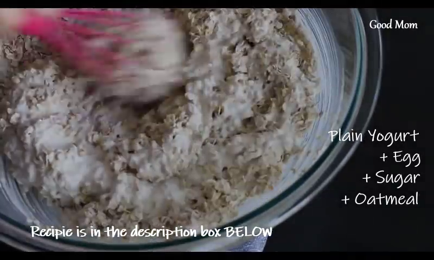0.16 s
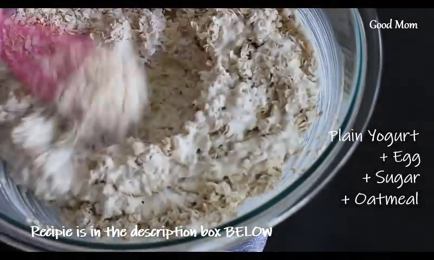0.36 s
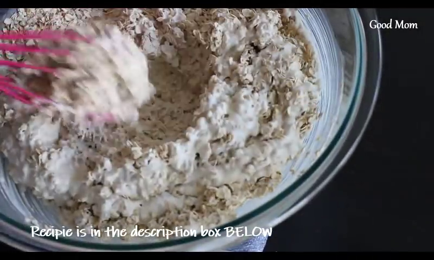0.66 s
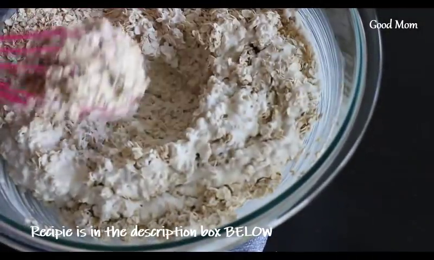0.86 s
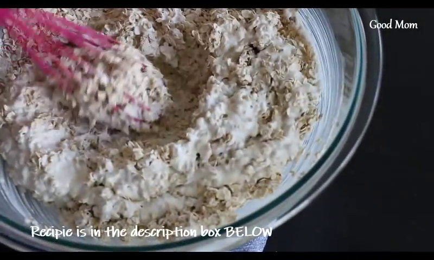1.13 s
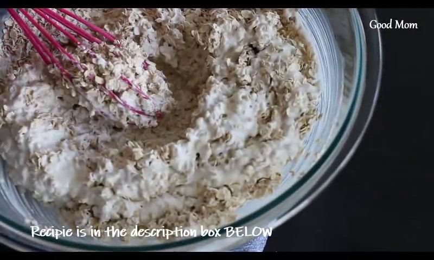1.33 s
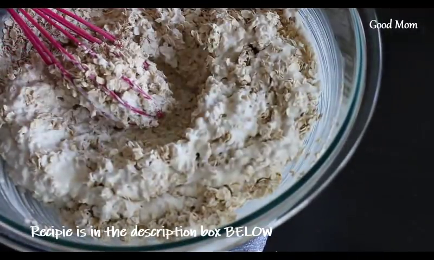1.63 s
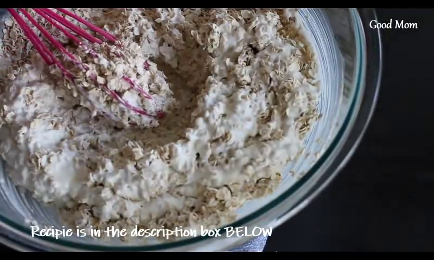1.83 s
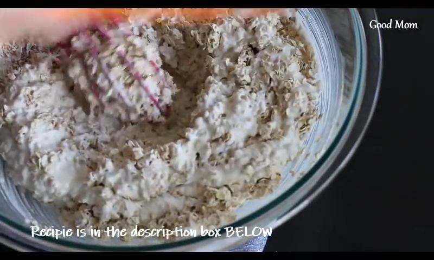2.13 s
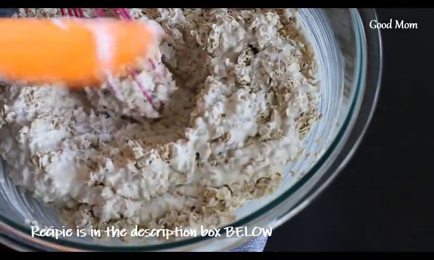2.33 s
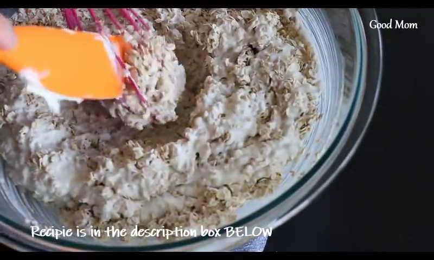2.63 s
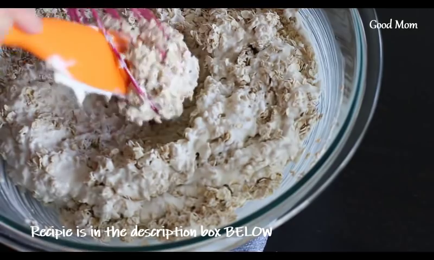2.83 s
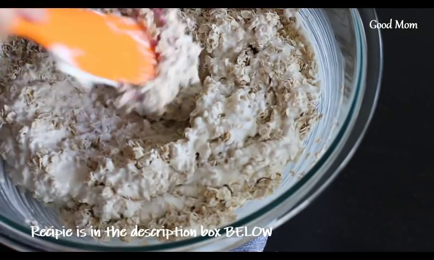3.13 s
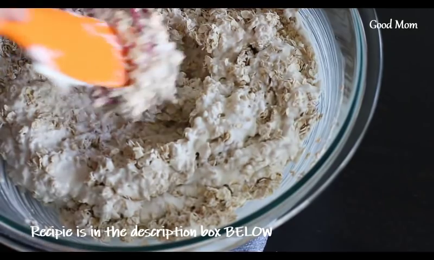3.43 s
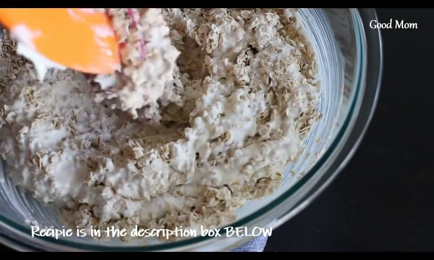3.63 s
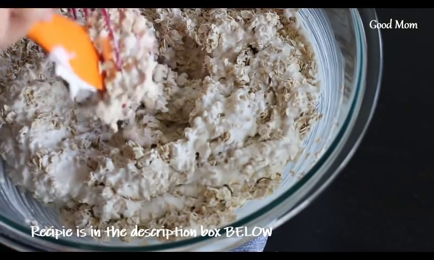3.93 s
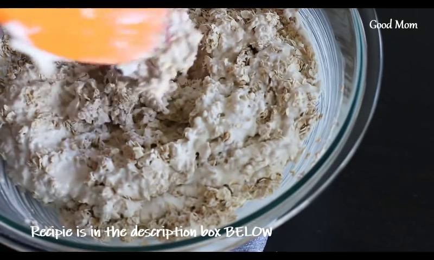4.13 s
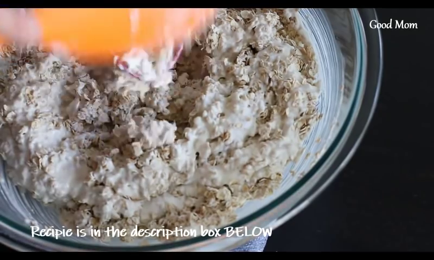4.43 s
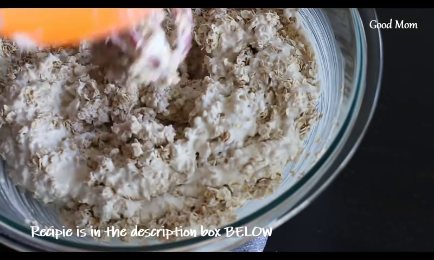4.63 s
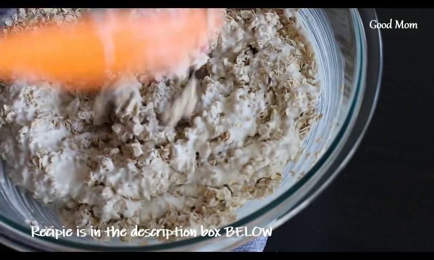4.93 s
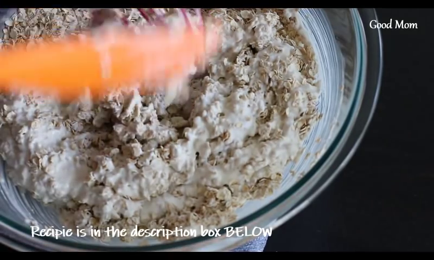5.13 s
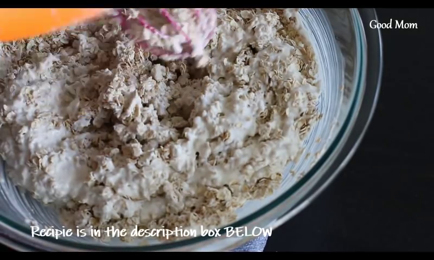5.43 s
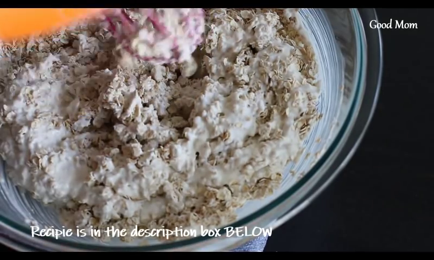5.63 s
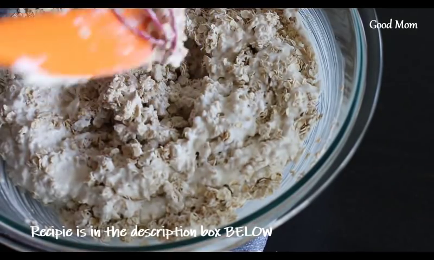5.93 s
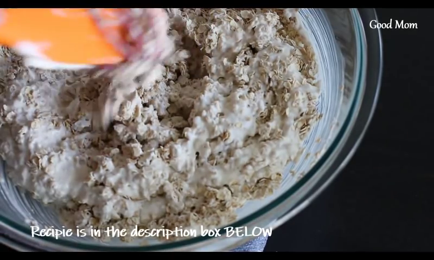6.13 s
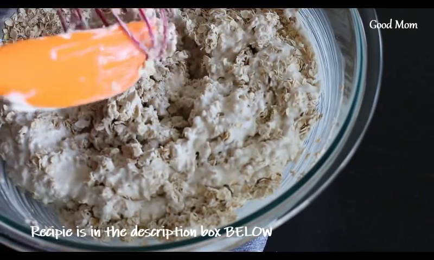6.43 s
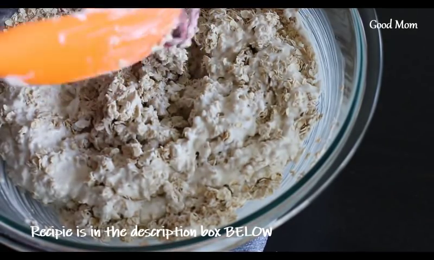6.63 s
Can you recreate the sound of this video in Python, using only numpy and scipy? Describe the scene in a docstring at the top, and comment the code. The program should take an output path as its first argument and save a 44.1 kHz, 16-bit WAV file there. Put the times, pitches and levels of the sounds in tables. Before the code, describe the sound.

Sticky whisking lasts about half a second, coarse and pasty, then the whisk strikes the glass bowl twice, sharply and very loudly, and a third time gently with a mellow, damped ring. Room echo follows. Low soft bumps mark utensils changing hands, then irregular spatula strokes squelch and crackle quietly along the wires, wetter at first, drier and sparser later. Close microphone, reverberant kitchen, faint steady hiss.

```python
"""A whisk stirs thick oat batter in a glass bowl (noise pops), then knocks the rim three times, the last softly:
decaying sines for whisk and glass, noise bursts for crack, thud and splat.
A silicone spatula wipes the sticky batter off the wires: swelling crackle and squelch, wet ticks, short rasps.
Soft low handling bumps. Close pickup in a lively kitchen (decaying-noise reverb), faint steady hiss."""
import sys
import numpy as np
from scipy import signal
from scipy.fft import rfft, irfft, next_fast_len
from scipy.io import wavfile

SR = 44100
rng = np.random.default_rng(int(sys.argv[2]) if len(sys.argv) > 2 else 0)


def wav_out(sig):
    """Save sig, one row per channel (or a flat mono array), as 16-bit PCM at SR to the path in sys.argv[1]."""
    wavfile.write(sys.argv[1], SR, np.round(np.clip(np.atleast_2d(sig).T, -1, 1) * 32767).astype(np.int16))


N = 298116

# Effort of the whisk in the batter. Each row: time in seconds, effort in dB.
WHISK_EFFORT = [(0.0, -50), (0.036, -49), (0.086, -42), (0.104, -49.5), (0.18, -41.5), (0.36, -46),
                (0.418, -39.5), (0.5, -48.5), (0.574, -45.5), (0.638, -63.5), (0.7, -71)]
# Spatula strokes along the wires. Each row: peak time in seconds, pressure in dB, width at -3 dB in seconds.
STROKES = [(2.36, -54, 0.098), (2.55, -50, 0.022), (2.612, -44, 0.056), (2.786, -46, .078),
           (2.907, -48.5, 0.076), (3.115, -44, 0.043), (3.172, -48, 0.053), (3.29, -50, .06),
           (3.465, -48.5, 0.061), (3.574, -55, .075), (3.706, -46.5, 0.063), (3.907, -49.5, .05),
           (4.005, -54, 0.033), (4.296, -49.5, 0.032), (4.49, -54, 0.027), (4.699, -49.5, 0.02),
           (4.888, -52, 0.02), (5.095, -45, 0.022), (5.281, -49, 0.015), (5.48, -47.5, 0.012),
           (6.021, -45, 0.055), (6.138, -54.5, .042), (6.408, -54.5, 0.036)]
# Whisk on the rim. Each row: start in seconds, ring gain in dB, contact brightness in Hz,
# t60 under the pressed whisk in seconds, clack gain in dB, crack level in dB, thud level in dB.
RIM_KNOCKS = [(0.7363, -3, 7210, 0.066, -5.5, -9, -26), (0.9063, -6.5, 3800, 0.11, -8.5, -32, -28),
              (1.214, 1, 462, 15, -34, -49, -18)]
# Modes of the glass bowl. Each row: frequency in Hz, relative level in dB, t60 in seconds.
BOWL_MODES = [(390.8, -18.5, 0.42), (1028, -18, 0.5), (1883, -11.5, 0.13), (2962, -4, 0.12),
              (4164, -8, 0.16), (5560, -14.5, 0.26), (6560, -19.5, 0.11), (7000, -14.5, 0.24),
              (7850, -15, 0.059), (8470, -26.5, 0.048), (8900, -17, 0.02), (9940, -20, 0.029)]
# Modes of the whisk's hard, dead clack. Each row: frequency in Hz, relative level in dB, t60 in seconds.
WHISK_MODES = [(720, -25, 0.025), (968, -8, 0.04), (1145, -3, 0.026), (1344, 1.5, 0.0078),
               (1730, -3, 0.0083), (1978, -26.5, .02), (3870, -7.5, 0.0076), (4800, -22, 0.014)]
# Thickest sticky strands snapping. Each row: time in seconds, peak level in dB, centre in Hz.
THICK_STRANDS = [(0.0833, -31, 2780), (0.1326, -36, 4500), (0.2034, -25, 4020), (0.449, -27, 4500),
                 (0.413, -21.5, 5220), (0.5307, -27.5, 6290), (1.6979, -33.5, 2800), (2.0048, -23.5, 5070),
                 (2.1081, -27.5, 4500), (2.2121, -33.5, 3000), (2.304, -30.5, 7260), (2.3291, -24.5, 2670),
                 (2.4184, -24.5, 2580), (3.093, -30, 7060), (4.0682, -35.5, 6900), (5.4171, -31.5, 6490),
                 (5.638, -33, 2960), (5.8383, -35.5, 3800)]
# Dull handling bumps. Each row: start in seconds, level in dB.
HANDLING_BUMPS = [(1.549, -54), (1.907, -52.5), (1.955, -42.5)]
# Rubbing at one pitch, in a wire, an air pocket or the glass. Each row: middle in seconds, rms level there in dB,
# Gaussian sigma in seconds, resonance in Hz, bandwidth of each of two filter stages in Hz.
PITCHED_RUBS = [(0.079, -48, 0.02, 2720, 640), (0.185, -51.5, 0.013, 487, 223),
                (2.329, -45, 0.0022, 1200, 1810), (2.625, -59.5, 0.053, 545, 250),
                (6.12, -64, .04, 2970, 80), (6.176, -68.5, 0.073, 1045, 60)]

# Spectrum of the air pockets torn by the whisk. Each row: frequency in Hz, relative density in dB per Hz.
CRACKLE_SPECTRUM = [(300, -27), (1500, -8), (2600, -1.5), (3400, -5), (4500, 0.5), (7200, 1), (8200, -3),
                    (9500, -13.5), (12000, -25), (15500, -37)]
# Spectrum of the spatula's crackle. Each row: frequency in Hz, relative density in dB per Hz.
WIPE_SPECTRUM = [(300, -30), (1800, -17), (2400, -4.5), (3500, -8.5), (5000, -4), (7200, -2.5), (8300, -7),
                 (10000, -18), (12500, -30), (15500, -38)]
# Spectrum of paste giving way. Each row: frequency in Hz, relative density in dB per Hz.
SQUELCH_SPECTRUM = [(60, -10), (200, 3.5), (500, 2.5), (1200, 2.5), (2000, -3.5), (4000, -15), (9000, -53)]
# Colour common to all strand snaps. Each row: frequency in Hz, relative level in dB.
SNAP_SPECTRUM = [(200, -11), (2500, 2), (7000, 5), (8500, 0), (10000, -17.5), (12500, -22), (16000, -32)]
# Spectrum of the thud through the counter. Each row: frequency in Hz, relative density in dB per Hz.
THUD_SPECTRUM = [(25, -8.5), (70, -3), (135, -8.5), (250, -10.5), (450, 9), (600, -3.5), (800, 2.5),
                 (1300, -23), (4000, -46)]
# Spectrum of the handling bumps. Each row: frequency in Hz, relative density in dB per Hz.
BUMP_SPECTRUM = [(30, -28), (120, -7.5), (200, 8), (320, -3.5), (600, -11.5), (2000, -38)]
# Spectrum of the steady hiss. Each row: frequency in Hz, relative density in dB per Hz.
HISS_SPECTRUM = [(15, -39), (25, -8.5), (119, -2.5), (178, -2), (322, -1.5), (523, -5), (614, -5.5),
                 (871, -5.5), (1490, -8), (1750, -9.5), (2300, -10), (2630, -11), (4150, -12),
                 (11500, -24.5), (15500, -38)]
# Spectrum of the sharp knock transient. Each row: frequency in Hz, relative density in dB per Hz.
CRACK_SPECTRUM = [(200, -20), (2500, -23), (4500, 12), (7000, 9.5), (9000, -6), (12000, -13), (16000, -25)]
# Spectrum of batter squirting out. Each row: frequency in Hz, relative density in dB per Hz.
SPLAT_SPECTRUM = [(300, -20), (1600, -23.5), (2600, 3.5), (3400, -11), (4300, -1), (7500, -1.5), (9000, -5),
                  (12000, -21), (16000, -54)]
# Reverberation of the kitchen. Each row: frequency in Hz, t60 in seconds.
KITCHEN_T60 = [(150, 0.55), (500, 0.65), (1400, 0.77), (3500, 0.64), (7000, 0.59), (11000, 0.24)]
# Reflection from the walls. Each row: frequency in Hz, relative level in dB.
WALL_REFLECTION = [(100, 1.5), (250, 0.5), (400, -4.5), (560, 5), (1000, 3.5), (2000, 2), (2500, -4),
                   (3000, 1), (4200, -3.5), (7000, -7), (12000, -14.5)]

TOP_HZ = 15700  # band limit, -3 dB
STIR_CRACKLE_DB, STIR_SQUELCH_DB = -1, -10.5  # re effort
RISE_SHARE = 0.45  # part of a stroke's width before its peak
CLEANING_START_S, CLEANING_END_S = 2.56, 5  # wires go from loaded to nearly clean
WIPE_CRACKLE_DB, LOADED_SQUELCH_DB, CLEAN_SQUELCH_DB = -2.0, -13, -28  # re pressure
CLEAN_LOW_HZ = 3500  # a thin film of batter crackles mostly above this
STRAND_RATE_PER_S, STRAND_OVER_MOTION_DB, STRAND_SPREAD_DB = 22, 8, 4.5  # thin strands; spread is 1 sigma
STRAND_HZ, STRAND_SPREAD_OCTAVES = 5800, 0.37  # median pitch, 1 sigma
SINK_S = 0.2  # after the last knock: time for the settling whisk to damp the ring by a factor e
RING_ROOM_DB, CLACK_ROOM_DB, PASTE_ROOM_DB = -3, -9.5, -7.5  # glass radiates more widely than whisk or batter


def amp(db):
    """Decibels to gain."""
    return 10 ** (np.asarray(db) / 20)


def unit(x):
    """Scale to rms 1."""
    return x / np.sqrt(np.mean(x ** 2) + 1e-20)


def along(points, hz):
    """Interpolate (Hz, value) rows on a log-frequency axis."""
    point_hz, values = np.transpose(points)
    return np.interp(np.log(hz + 1), np.log(point_hz), values)


def filtered(x, response):
    """Multiply the spectrum of x by a response of frequency."""
    size = next_fast_len(len(x) + 8192)
    hz = np.fft.rfftfreq(size, 1 / SR)
    return irfft(rfft(x, size) * response(hz), size)[:len(x)]


def coloured(x, spectrum):
    """Shape x by a spectrum, at rms 1."""
    return unit(filtered(x, lambda hz: amp(along(spectrum, hz))))


def add(track, start_s, sound):
    """Mix a sound into the track."""
    part = track[max(round(start_s * SR), 0):][:len(sound)]
    part += sound[:len(part)]


def puff(spectrum, t60):
    """One second of coloured noise: instant onset, exponential decay."""
    decay = amp(-60 * np.arange(SR) / SR / t60)
    return coloured(rng.standard_normal(SR), spectrum) * decay


def ring(modes, bright_hz):
    """One second of struck modes; a soft contact (low bright_hz) leaves the high ones weak."""
    t = np.arange(SR) / SR
    out = np.zeros(SR)
    for k, (hz, db, t60_s) in enumerate(modes):
        mode = amp(db - 60 * t / t60_s) * np.sin(2 * np.pi * hz * t)
        out += (-1) ** k * mode / np.hypot(1, (hz / bright_hz) ** 2)
    return out


def grains(spectrum, rate, spread_db, smooth):
    """Random pops (rate per second) of unequal size over smooth noise, at rms 1."""
    sizes = amp(spread_db * np.minimum(rng.exponential(size=N), 4)) * rng.choice([-1, 1], N)
    pops = unit(sizes * (rng.random(N) < rate / SR))
    return coloured(pops + smooth * rng.standard_normal(N), spectrum)


def hiss():
    """Steady coloured noise."""
    return amp(-56.5) * coloured(rng.standard_normal(N), HISS_SPECTRUM)


def kitchen(x):
    """Walls answer a few milliseconds late with a noise tail whose treble dies first."""
    hz, t, cells = signal.stft(rng.standard_normal(SR), SR, nperseg=256)
    decay = amp(-60 * t / along(KITCHEN_T60, hz)[:, None])
    tail = signal.istft(cells * decay, SR, nperseg=256)[1]
    tail = filtered(tail / np.linalg.norm(tail), lambda f: amp(along(WALL_REFLECTION, f)))
    delayed_tail = np.pad(tail, (SR // 150, 0))
    return signal.fftconvolve(x, delayed_tail)[:N]


def settling():
    """The batter keeps up a very faint, constant fizz of sparse pops."""
    return amp(-64.5) * grains(WIPE_SPECTRUM, rate=390.0, spread_db=0.0, smooth=0.05)


def bumps():
    """Soft low noise bumps as the utensils change hands."""
    out = np.zeros(N)
    for start_s, db in HANDLING_BUMPS:
        add(out, start_s, amp(db) * puff(BUMP_SPECTRUM, t60=0.26))
    return out


def glass(x):
    """Whatever rubs in the bowl excites its modes."""
    modes = ring(BOWL_MODES, bright_hz=3810)
    return signal.fftconvolve(x, modes / np.linalg.norm(modes))[:N]


def rasps():
    """Irregular slips drive a single resonance for a moment."""
    t, out = np.arange(N) / SR, np.zeros(N)
    slips = rng.standard_normal(N) * (rng.random(N) < 900 / SR)
    for middle_s, db, sigma_s, hz, width_hz in PITCHED_RUBS:
        def resonance(f):
            """Two equal band-pass stages."""
            return (1j * f * width_hz / (hz * hz - f * f + 1j * f * width_hz)) ** 2
        swell = np.exp(-((t - middle_s) / sigma_s) ** 2 / 2)
        out += amp(db) * unit(filtered(slips, resonance)) * swell
    return out


def thin_strands(motion):
    """Thin strands break at random, as loudly as the utensils move: rows like THICK_STRANDS."""
    chance = rng.random((400, 1))
    scatter = rng.standard_normal((len(chance), 2))
    times_s = np.cumsum(-np.log(chance[:, 0])) / STRAND_RATE_PER_S
    rows = []
    for time_s, (size, pitch) in zip(times_s, scatter):
        if time_s < N / SR:
            motion_db = 20 * np.log10(motion[int(time_s * SR)] + 1e-9)
            peak_db = motion_db + STRAND_OVER_MOTION_DB + STRAND_SPREAD_DB * size
            rows.append((time_s, peak_db, STRAND_HZ * 2 ** (STRAND_SPREAD_OCTAVES * pitch)))
    return rows


def ticks(strands):
    """A snapping strand is a short noise click around its own pitch."""
    out, t = np.zeros(N), np.arange(SR // 40) / SR
    decay = amp(-60 * t / 0.0035)
    for time_s, peak_db, hz in strands:
        def snap(f):
            """Band-pass of Q 0.9 with the common colour."""
            return amp(along(SNAP_SPECTRUM, f)) / (1 + 0.9j * (f / hz - hz / (f + 1)))
        burst = rng.standard_normal(len(t)) * decay
        click = filtered(np.pad(burst, (SR // 2000, 0)), snap)
        add(out, time_s + 0.0004, amp(peak_db) * click / np.abs(click).max())
    return out


def pressure():
    """Spatula pressure as a gain: each stroke swells a little faster than it fades."""
    t, out = np.arange(N) / SR, np.zeros(N)
    for peak_s, db, width_s in STROKES:
        side_s = width_s * np.where(t < peak_s, RISE_SHARE, 1 - RISE_SHARE)
        u = (t - peak_s) / side_s
        out += amp(db) / np.hypot(1, u * u * u)
    return out


def wipes(press):
    """Strokes crackle finely; as the batter comes off they squelch less and sound thinner."""
    clean = np.interp(np.arange(N) / SR, (CLEANING_START_S, CLEANING_END_S), [0, 1])
    thick = grains(WIPE_SPECTRUM, rate=3000, spread_db=4.5, smooth=0.52)
    thin = unit(filtered(thick, lambda hz: hz ** 2 / (hz ** 2 + CLEAN_LOW_HZ ** 2)))
    crackle = amp(WIPE_CRACKLE_DB) * ((1 - clean) * thick + clean * thin)
    squelch_db = LOADED_SQUELCH_DB + clean * (CLEAN_SQUELCH_DB - LOADED_SQUELCH_DB)
    squelch = amp(squelch_db) * grains(SQUELCH_SPECTRUM, rate=900, spread_db=2.5, smooth=0.67)
    return press * (crackle + squelch)


def effort():
    """Whisk effort as a gain; it stops when lifted out."""
    time_s, effort_db = np.transpose(WHISK_EFFORT)
    t = np.arange(N) / SR
    return amp(np.interp(t, time_s, effort_db)) * (t < time_s[-1])


def stirring(level):
    """The whisk tears coarse air pockets; the paste gives way in clumps."""
    slow = unit(filtered(rng.standard_normal(N), lambda hz: np.exp(-(hz / 40) ** 2)))
    clumps = amp(1.75 * slow)  # dB, 1 sigma
    crackle = amp(STIR_CRACKLE_DB) * grains(CRACKLE_SPECTRUM, rate=1100, spread_db=2, smooth=0.4)
    squelch = amp(STIR_SQUELCH_DB) * grains(SQUELCH_SPECTRUM, rate=250, spread_db=-1.5, smooth=0.61)
    return level * clumps * (crackle + squelch)


def splat():
    """On the last knock a pad of batter cushions the whisk and squirts out: a noise burst."""
    out = np.zeros(N)
    add(out, RIM_KNOCKS[-1][0], amp(-26.5) * puff(SPLAT_SPECTRUM, t60=0.025))
    return out


def knocks():
    """Each knock is a dead clack of the whisk, a sharp crack and a thud through the counter."""
    out = np.zeros(N)
    for start_s, *_, clack_db, crack_db, thud_db in RIM_KNOCKS:
        add(out, start_s, amp(clack_db) * ring(WHISK_MODES, bright_hz=6045))
        crack = amp(crack_db) * puff(CRACK_SPECTRUM, t60=0.016)
        thud = amp(thud_db) * puff(THUD_SPECTRUM, t60=0.062)
        add(out, start_s, crack + thud)
    return out


def ringing():
    """A hard knock keeps the whisk pressed on the glass and chokes it; a soft one lets it ring."""
    out, t = np.zeros(N), np.arange(SR) / SR
    for start_s, db, bright_hz, choke_t60_s, *_ in RIM_KNOCKS:
        add(out, start_s, amp(db - 60 * t / choke_t60_s) * ring(BOWL_MODES, bright_hz))
    # after the last knock the whisk sinks onto the rim and damps it ever more firmly
    resting_s = np.maximum(np.arange(N) / SR - RIM_KNOCKS[-1][0], 0)
    return out * np.exp(-(resting_s / SINK_S) ** 2)


def scene():
    """Bowl, utensils and batter in the room, over steady hiss."""
    bowl, blows = ringing(), knocks() + bumps()
    whisk, spatula = effort(), pressure()
    noise = hiss()
    paste = stirring(whisk) + wipes(spatula) + rasps() + settling() + splat()
    strands = THICK_STRANDS + thin_strands(whisk + spatula)
    paste = paste + ticks(strands)
    room = kitchen(amp(RING_ROOM_DB) * bowl + amp(CLACK_ROOM_DB) * blows + amp(PASTE_ROOM_DB) * paste)
    return (bowl + blows + paste + amp(-32) * glass(paste) + room + noise)[None]


def record(dry):
    """Clip at full scale, then a steep low-pass at the band limit."""
    clipped = np.clip(dry[0], -1, 1)
    return filtered(clipped, lambda hz: 1 / np.hypot(1, (hz / TOP_HZ) ** 60))[None]


dry = scene()
out = record(dry)
wav_out(out)
```